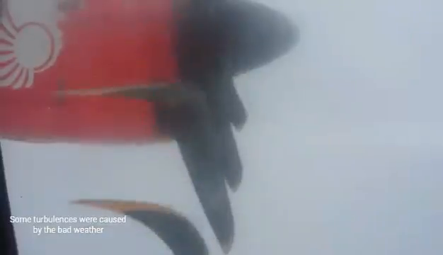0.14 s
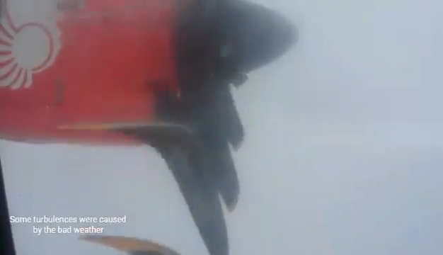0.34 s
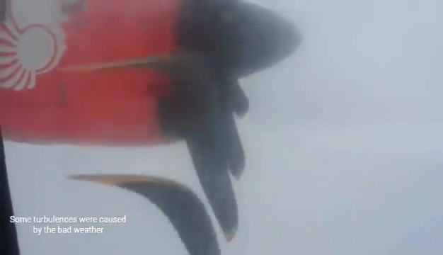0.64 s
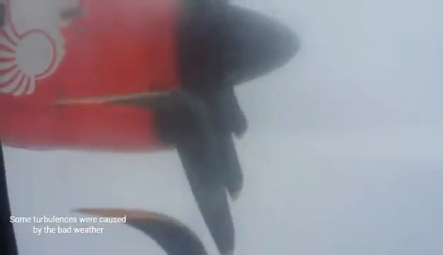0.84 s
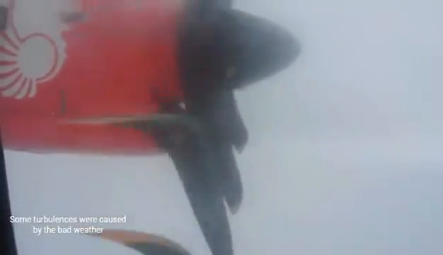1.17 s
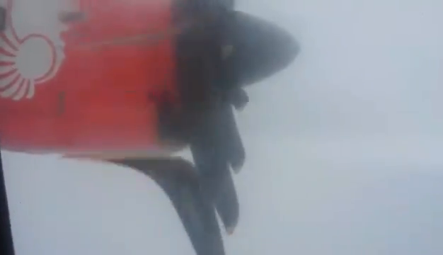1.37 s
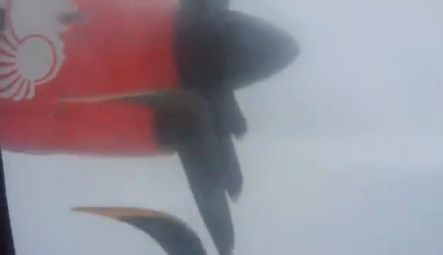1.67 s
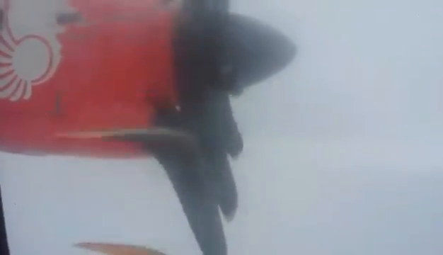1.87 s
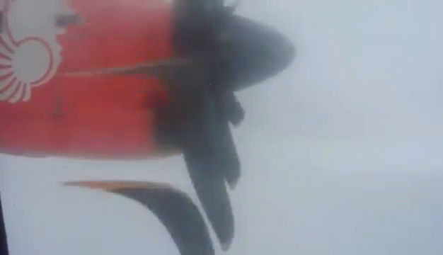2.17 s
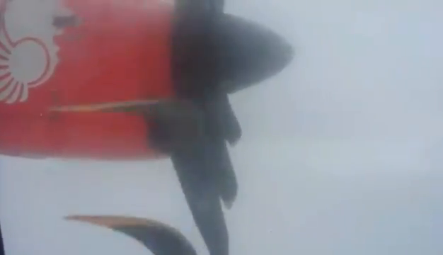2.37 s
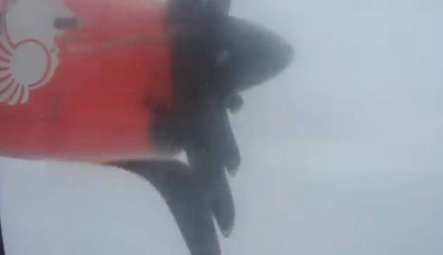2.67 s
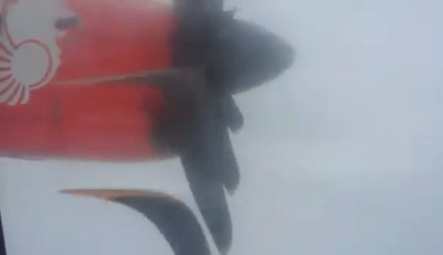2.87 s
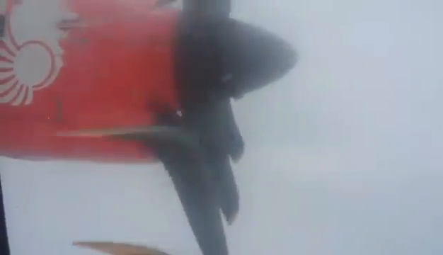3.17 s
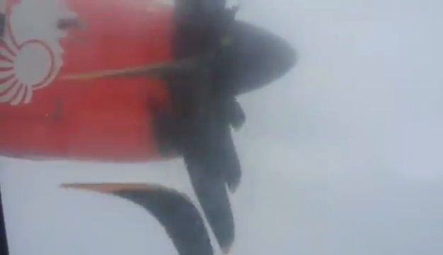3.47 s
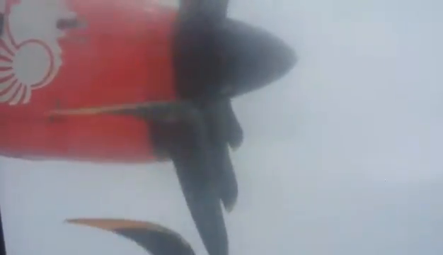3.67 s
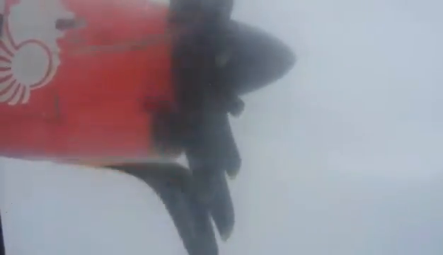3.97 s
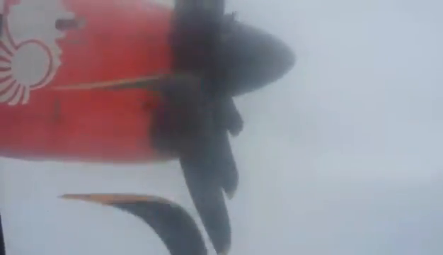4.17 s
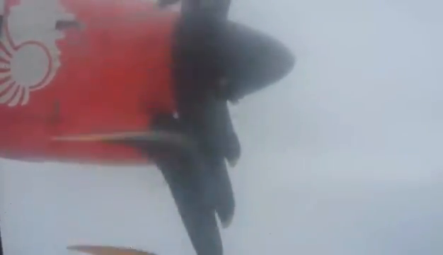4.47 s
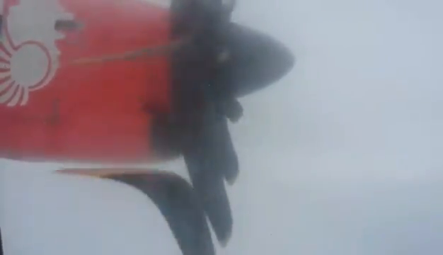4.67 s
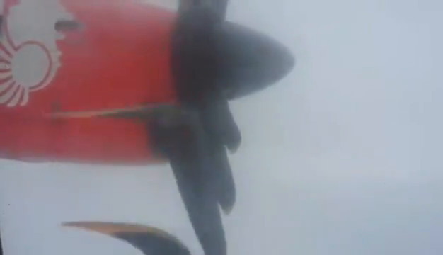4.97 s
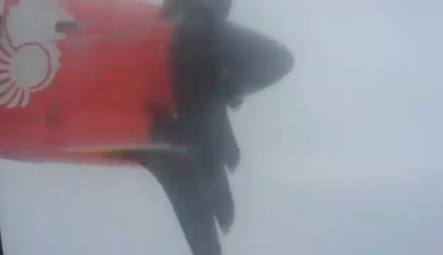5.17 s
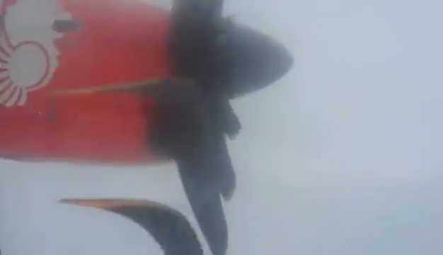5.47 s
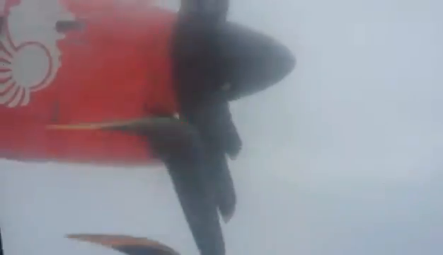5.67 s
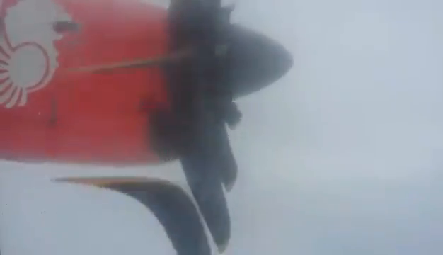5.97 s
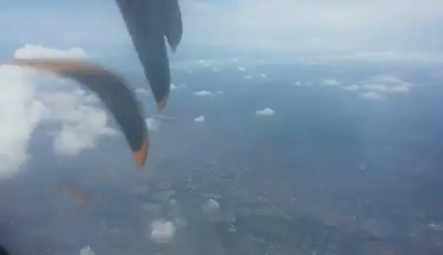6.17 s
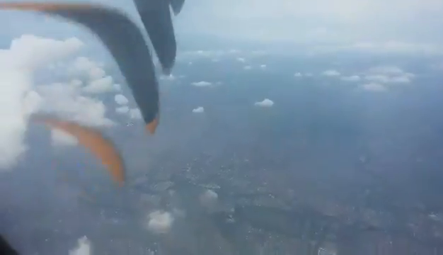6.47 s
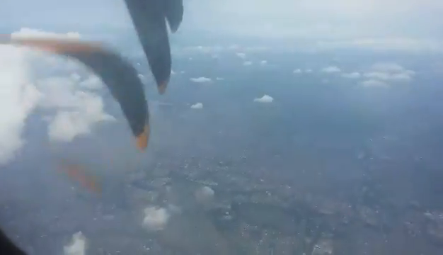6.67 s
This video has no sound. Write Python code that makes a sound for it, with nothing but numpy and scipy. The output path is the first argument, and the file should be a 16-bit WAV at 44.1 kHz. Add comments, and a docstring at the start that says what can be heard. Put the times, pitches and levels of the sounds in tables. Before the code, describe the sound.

A turboprop engine drones deeply in flight, heard from the cabin with air hiss and faint rattles, briefly dropping to silence near the end.

```python
"""Inside a turboprop cabin in flight, by the window. The propeller blades thump the hull at a governed
rate, making a low harmonic tone. Turbulent air hisses over the skin and booms through the wall panels,
the hull rumbles, the gearbox whines faintly and a few small rattles sound. The sound stops abruptly;
after a short silence a later moment of the flight fades up, its blade tone weaker."""
import sys
import numpy as np
from scipy import signal
from scipy.fft import rfft, irfft
from scipy.io import wavfile
from scipy.ndimage import uniform_filter1d

SR = 44100
rng = np.random.default_rng(int(sys.argv[2]) if len(sys.argv) > 2 else 0)


def put_to_file(sound):
    """Save the sound as 16-bit audio at rate SR, in the file named by the first command-line argument."""
    columns = np.atleast_2d(sound).T  # one column per channel
    safe = np.clip(columns, -1, 1)
    whole_steps = np.round(safe * 32767)
    wavfile.write(sys.argv[1], SR, whole_steps.astype(np.int16))


N = 300762
T = np.arange(N) / SR
STOP_S = 6.1149  # end of the first moment


def gain_of(db):
    """Amplitude ratio of a level in decibels."""
    return 10 ** (np.asarray(db) / 20)


def unit_rms(x):
    """Normalisation to a mean power of 1."""
    return x / np.sqrt(np.mean(x ** 2) + 1e-20)


def wander(fastest_hz, slowest_hz=.2, size=N):
    """Slow sinusoids of random phase superpose into a drift of rms 1."""
    hz = np.geomspace(slowest_hz, fastest_hz, num=24)[:, None]
    t = np.linspace(0, N / SR, size)
    waves = np.sin(2 * np.pi * (hz * t + rng.random((24, 1))))
    return unit_rms((waves / np.sqrt(hz)).sum(0))


def blades(level_db):
    """Periodic forcing: each passing blade pulls a dip of pressure. Higher harmonics waver more."""
    # partials of the blade tone: harmonic_number, relative_db
    harmonics = [(1, 0.5), (2, -13.5), (3, -32)]
    blade_hz = 98.4
    phase = 2 * np.pi * blade_hz * (T - STOP_S) + 0.18 * wander(3.)  # the stop falls in a dip
    dips = -sum(gain_of(db + 0.36 * k ** 2 * wander(9., 1.5)) * np.cos(k * phase) for k, db in harmonics)
    return np.sqrt(2) * gain_of(level_db) * dips


def airflow(spectrum, patchy_db, flicker_db, size=1024):
    """Turbulence gives broadband noise (rms 1) whose level drifts in patches and flickers as a whole."""
    frames, hz = 4 * N // size + 5, np.fft.rfftfreq(size, 1 / SR)
    real, imag, patches = rng.standard_normal((frames, len(hz), 3)).T
    patches = uniform_filter1d(patches, size=9, axis=0)  # smooth over frequency
    patches = unit_rms(uniform_filter1d(patches, size=4, axis=1))  # and over time
    knots_hz, knots_db = np.transpose(spectrum)
    shape_db = np.interp(np.log(hz + 1), np.log(knots_hz), knots_db, right=-120)
    shape_db[hz < knots_hz[0]] -= 20
    level_db = shape_db[:, None] + patchy_db * patches + flicker_db * wander(25., 3.5, size=frames)
    spectra = (real + 1j * imag) * gain_of(level_db)
    return unit_rms(signal.istft(spectra, nperseg=size, noverlap=3 * size // 4)[1][:N])


def cabin(levels, rumble, boom, hiss, treble_db):
    """Superposition of the blade tone and four noise bands; the two hisses follow the treble level."""
    # highest band of hiss: frequency_hz, relative_density_db
    top_hiss = [(7300, -18), (7750, -5.5), (8150, -1.5), (8700, -10.5), (9700, -8.5), (10600, -16),
                (11100, -24.5), (11500, -26), (12000, -34)]
    blade_db, rumble_db, boom_db, hiss_db, top_db = levels
    return (blades(blade_db)
            + gain_of(rumble_db) * airflow(rumble, patchy_db=1.17, flicker_db=1.9, size=4096)
            + gain_of(boom_db) * airflow(boom, patchy_db=0.85, flicker_db=-0.05, size=4096)
            + gain_of(hiss_db + treble_db) * airflow(hiss, patchy_db=1.3, flicker_db=0.39)
            + gain_of(top_db + 1.2 * treble_db) * airflow(top_hiss, patchy_db=6.0, flicker_db=1.4))


def gearbox(swell_db):
    """Two gear tones with sidebands one blade rate apart, each wavering in amplitude and phase."""
    # lines of the whine: pitch_hz, level_db
    whine = [(6328, -84.5), (6365, -85), (6525, -77.5), (6562, -84), (6624, -81.5), (6660, -82),
             (6723, -75.5), (6758, -76), (6821, -83.5)]
    out = np.zeros(N)
    for hz, db in whine:
        amplitude = np.sqrt(2) * gain_of(db + swell_db + 2.3 * wander(3.6))
        out += amplitude * np.sin(2 * np.pi * hz * T + 1.5 * wander(2.))
    return out


def rattles():
    """Damped transients: bursts of band noise that rise quickly and decay more slowly."""
    # four rattles, then three brief swells of hiss: start_s, peak_db, rise_s, centre_hz, width_hz
    bursts = [(2.684, -38, 0.013, 1590, 3150), (3.962, -46, 0.0086, 3200, 2400),
              (4.243, -42.5, 0.0092, 2980, 3000), (4.753, -48, 0.0046, 4300, 1790),
              (5.61, -59, 0.034, 9300, 2200), (5.862, -58.5, .06, 8800, 2000),
              (5.963, -52, .035, 5830, 3000)]
    size = 8192
    out, hz = np.zeros(N), np.fft.rfftfreq(size, 1 / SR)
    for start_s, peak_db, rise_s, centre_hz, width_hz in bursts:
        band = np.exp(-2 * ((hz - centre_hz) / width_hz) ** 2)
        noise = unit_rms(irfft(rfft(rng.standard_normal(size)) * band))
        age = np.arange(size) / SR / rise_s
        out[round(start_s * SR):][:size] += gain_of(peak_db) * age * np.exp(1 - age) * noise
    return out


def scene():
    """The sources add in two moments of the flight, parted by silence."""
    # base levels of the layers: blade_db, rumble_db, boom_db, hiss_db, top_db
    first_levels = (-10, -19, -23, -41.5, -65.5)
    later_levels = (-12.5, -15.5, -16, -36, -61.5)
    # hull rumble with one strong cabin mode: frequency_hz, relative_density_db
    first_rumble = [(20, -18), (46, -18), (66, -10), (88, -7.5), (110, -14.5), (130, 1), (158, -7.5),
                    (185, -12), (260, -29.5)]
    later_rumble = [(20, -21), (45, -26), (65, -3), (90, -17), (130, 2), (170, -6.5), (260, -34)]
    # boom of airflow transmitted through the wall panels: frequency_hz, relative_density_db
    first_boom = [(150, -20.5), (205, -3.5), (250, -1.5), (278, -5), (310, -3.5), (350, -0.5), (410, -4),
                  (465, -15.5), (490, -15), (700, -22), (1100, -36)]
    later_boom = [(150, -12), (200, -8.5), (260, -4), (300, -8), (385, -3), (430, -16.5), (700, -24.5),
                  (1100, -32.5)]
    # hiss of air over the skin: frequency_hz, relative_density_db
    first_hiss = [(400, -24.5), (800, -5.5), (1100, -7.5), (1650, -9.5), (1950, -10.5), (2320, -6.5),
                  (2600, -10), (2800, -15), (3080, -12.5), (3500, -19), (3900, -21.5), (4450, -21),
                  (5700, -27.5), (6740, -25), (7700, -29)]
    later_hiss = [(400, -32), (800, -13), (1200, -7.5), (1800, -11.5), (2100, -15), (2350, -15),
                  (3200, -21), (5000, -30), (7700, -42)]
    # slight swells of the treble in the first moment: time_s, level_db
    treble = [(0, 0.5), (.3, 2), (1.5, 0.14), (3, 0), (5.4, 0.3), (6.1, 1)]
    treble_db = np.interp(T, *np.transpose(treble))
    first = cabin(first_levels, first_rumble, first_boom, first_hiss, treble_db)
    first = first + gearbox(swell_db=2.2 * treble_db) + rattles()
    later = cabin(later_levels, later_rumble, later_boom, later_hiss, treble_db=0)
    fade_start_s, fade_length_s, step_s = 6.505, .33, .01003  # small steps, each a faint tick
    fade = np.maximum(np.ceil((T - fade_start_s) / step_s), 0) * step_s / fade_length_s
    return (first * (T < STOP_S) + later * fade)[None]


def record(dry):
    """Soft saturation rounds the rare peaks above a knee; a low-pass filter limits the bandwidth."""
    knee, ceiling, cutoff_hz = .75, .97, 11978
    excess, headroom = np.maximum(abs(dry) - knee, 0), ceiling - knee
    rounded = np.sign(dry) * (abs(dry) - excess + headroom * np.tanh(excess / headroom))
    lowpass = signal.firwin(511, cutoff_hz, window=("kaiser", 9), fs=SR)
    return signal.oaconvolve(rounded, lowpass[None], "same")


dry = scene()
out = record(dry)
put_to_file(out)
```